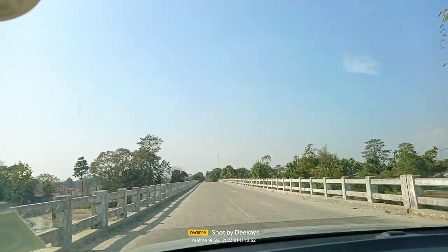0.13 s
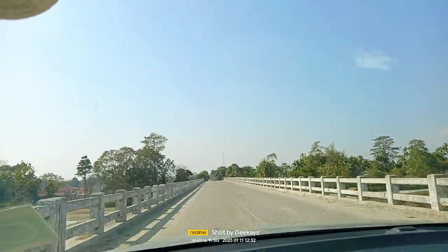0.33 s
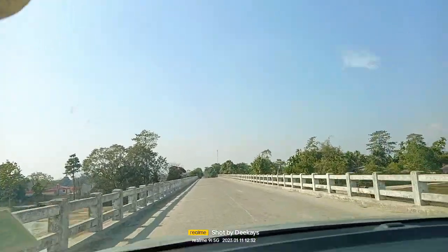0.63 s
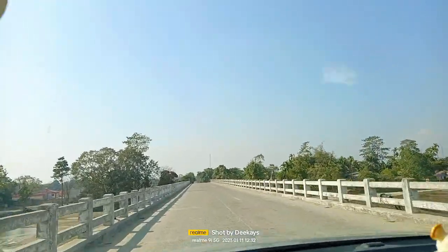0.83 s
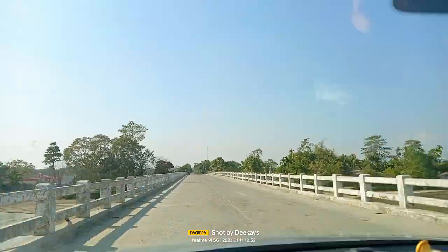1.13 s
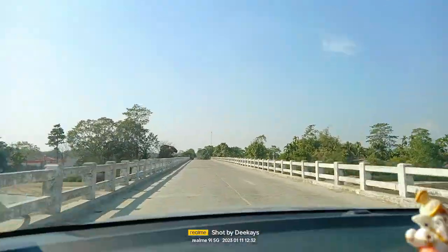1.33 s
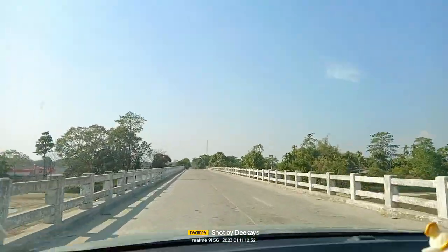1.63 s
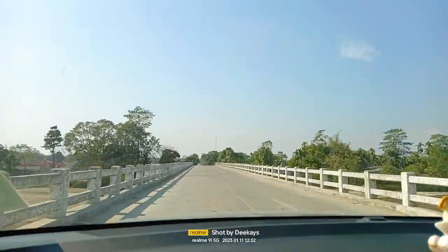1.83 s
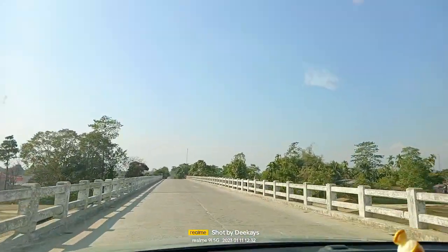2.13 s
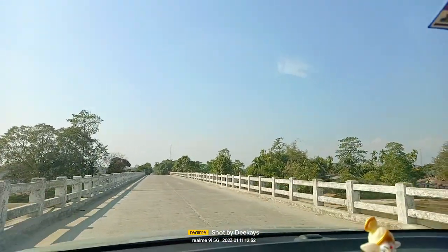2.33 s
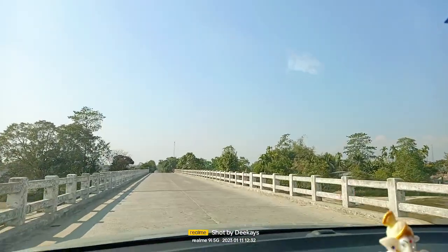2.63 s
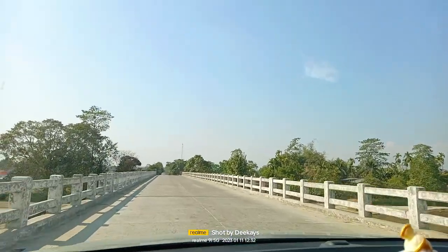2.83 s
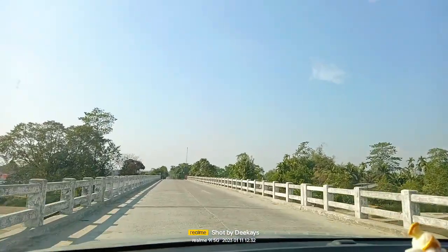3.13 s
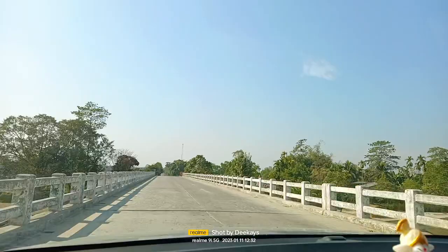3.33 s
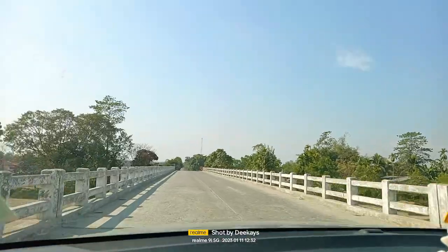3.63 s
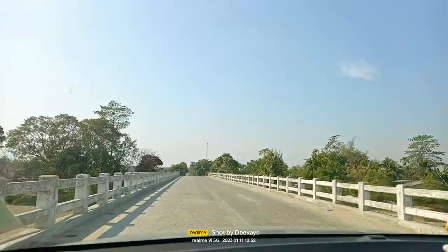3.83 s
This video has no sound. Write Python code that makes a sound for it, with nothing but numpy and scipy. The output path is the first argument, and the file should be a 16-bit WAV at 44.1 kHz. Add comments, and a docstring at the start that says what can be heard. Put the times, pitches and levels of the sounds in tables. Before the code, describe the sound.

Car interior on a concrete road: low rumble begins quietly, wheels hit a rough joint with booming thumps, trim knocks and a tiny metallic clink, then it settles into steady rumble, faint hiss and light ticks.

```python
"""Small car rolling onto a concrete bridge

Heard from the cabin: tyre roar is coloured noise plus narrow noise resonances, and body boom and
suspension pounding are low resonant noise. Bumps thump as swelling low sines; trim knocks are bursts
of contacts ringing plastic modes, panels are decaying sines, and loose bits rattle, clink and tick.
After the rough joint the car settles into an even rumble with soft thuds, under a thin hiss."""
import sys
import numpy as np
from scipy import signal
from scipy.fft import rfft, irfft
from scipy.io import wavfile
from scipy.ndimage import uniform_filter1d

SR = 44100
rng = np.random.default_rng(int(sys.argv[2]) if len(sys.argv) > 2 else 0)


def log_audio(samples):
    """Write samples as a 16-bit WAV file to the path given in sys.argv[1]."""
    # one column per channel
    frames = np.atleast_2d(samples).T
    # limit to full scale, then quantise
    limited = np.clip(frames, -1, 1)
    pcm = np.round(limited * 32767).astype(np.int16)
    wavfile.write(sys.argv[1], SR, pcm)


N = 176400  # 4 s
T = np.arange(N) / SR
HIT = T[:SR // 3]  # clock of a single hit, which stops after a third of a second

# Tyre roar, before the gains below: (time [s], level [dB])
ROAR_LEVEL = [(0, -46.5), (.6, -46), (.64, -38.5), (.73, -35.5), (.77, -49), (.81, -37.5), (.86, -31.5),
              (.99, -35), (1.17, -33.5), (1.26, -39.5), (1.37, -38.5), (1.51, -44.5), (1.62, -38),
              (1.76, -40.5), (2.1, -43.5), (2.65, -42), (3.15, -43), (3.5, -42), (4, -42)]
# Roar colour: (frequency [Hz], relative density [dB])
ROAR_COLOUR = [(25, -11.5), (80, -10), (190, 5.5), (300, 5.5), (490, 4), (750, 3.5), (1100, 0.5),
               (1600, -2.5), (2300, -8.5), (3000, -17.5), (3900, -23), (4800, -33), (6500, -35.5),
               (8000, -43.5), (9500, -38), (12000, -62.5), (16000, -42.5)]
# Tyre cavity resonances: (frequency [Hz], half-width [Hz], relative level [dB])
TYRE_RINGS = [(252.2, 16.2, -3.5), (358.5, 31, -10.5), (400.7, 37, -8.5), (600.4, 9.8, -12), (940, 160, -9),
              (1402, 30, -44.5), (2029, 150, -21)]
ROAR_GAIN_DB, RING_GAIN_DB = 2.5, 1.5
# Flutter depth, fastest flutter and the edges [Hz] of the bands that flutter
PATCHY_DB, PATCHY_HZ = 3.8, 11
BAND_EDGES = np.geomspace(170, 2700, 26)

# Shaking of the body, before its gain: (time [s], level [dB])
SHAKE_LEVEL = [(0, -43.5), (.18, -35), (.35, -24.5), (.52, -34), (.79, -30.5), (.88, -22.5), (1.2, -20.5),
               (1.35, -22.5), (1.52, -28.5), (1.76, -20.5), (1.92, -29.5), (2.3, -26), (2.75, -29.5),
               (3, -31.5), (3.15, -26.5), (3.38, -31), (3.6, -26), (3.8, -28), (4, -33.5)]
# Cabin resonances: (frequency [Hz], half-width [Hz], relative level [dB])
CABIN_BOOMS = [(101, 21.4, -1), (115.6, 18.5, -5), (150.7, 17, -6)]
SHAKE_GAIN_DB = -0.5

# Slow pounding of the suspension: (time [s], level [dB])
POUND_LEVEL = [(0, -40.5), (.2, -63), (.38, -38), (.57, -45), (.68, -38.5), (.95, -26), (1.5, -35.5),
               (2, -28.5), (2.4, -43.5), (3, -38), (3.5, -38), (4, -32)]
POUND_HZ, POUND_HALF_WIDTH_HZ = 50.5, 10

# Modes of the plastic trim: (frequency [Hz], relative level [dB], t60 in a knock [s])
TRIM_MODES = [(1070, -15, 0.12), (1388, -7.5, 0.052), (1651, -10, 0.093), (1854, -10, 0.1),
              (2078, -8, 0.05), (2434, -13, .07), (2623, -14, 0.023), (2910, -19, 0.046),
              (3717, -16, 0.035)]
# Chatter of loose bits: (time [s], level [dB])
CHATTER_LEVEL = [(0, -60.5), (.6, -54.5), (.66, -52), (.8, -45), (.88, -35), (1.02, -56), (1.18, -35.5),
                 (1.3, -54), (1.5, -54), (1.9, -53), (2.1, -56), (4, -55.5)]
CHATTER_PER_S, CHATTER_SPREAD_DB, CHATTER_T60_S = 190, 4, 0.031

# Faint steady hiss: (frequency [Hz], relative density [dB])
HISS_COLOUR = [(1000, 2), (4000, -2.5), (6500, -4.5), (8000, -8), (9300, -14), (11000, -16.5), (13800, -7),
               (15000, 5.5), (16000, 1.5)]
# Brighter opening hiss: (frequency [Hz], relative density [dB])
EARLY_HISS_COLOUR = [(1000, 17.5), (4000, 4.5), (6500, -3.5), (8000, -8), (9800, -4.5), (11000, -23),
                     (16000, -20)]
HISS_DB, EARLY_HISS_DB = -73, -49.5
EARLY_END_S, EARLY_FADE_S = 0.18, .09

# Trim knocks: (time [s], level before part gain [dB], lowest [Hz], highest [Hz],
#               snap relative to that level [dB], chatter length [s])
TRIM_KNOCKS = [(0.244, -43.5, 2550, 2960, -18.5, .004), (0.627, -33, 300, 3040, -23.5, .03),
               (.705, -36.5, 400, 2600, -40, .015), (.745, -41, 1750, 3670, -16, 0.018),
               (.839, -22.5, 504, 3600, -17, .003), (0.85, -20, 280, 3940, -19, .015),
               (0.884, -29, 596, 3740, -20, 0.011), (0.918, -34.5, 1790, 3600, -12.5, 0.019),
               (1.018, -62.5, 1800, 4050, 11, 0.0034), (1.115, -37, 1300, 3100, -23, 0.019),
               (1.158, -26.5, 1000, 3430, -24.5, 0.013), (1.202, -32, 1682, 3650, -14.5, 0.0067),
               (1.284, -43, 1760, 3700, -10, 0.022), (1.3935, -20, 1880, 3840, -19, .005),
               (1.396, -27, 460, 1120, -36, 0.0081), (1.579, -19, 1300, 4050, -24.5, .011),
               (1.634, -21.5, 1354, 3400, -19.5, .012), (1.662, -22.5, 221, 3180, -43, 0.0079),
               (1.669, -19.5, 243, 3060, -35, .006), (1.857, -24, 1295, 2630, -40.5, .018),
               (1.893, -30, 790, 2400, -41, .012), (1.93, -38.5, 1300, 2850, -34, .01),
               (2.076, -32.5, 614, 784, -33, .002), (2.189, -33.5, 790, 950, -35, 0.0037),
               (2.455, -50, 1970, 4000, -18, 0.0062)]
# Colour of snaps and ticks: (frequency [Hz], relative density [dB])
SNAP_COLOUR = [(2500, 1), (4200, -7.5), (5000, -0.5), (6500, -1.5), (8000, -10.5), (9600, -7.5),
               (11000, -24.5), (16000, -29.5)]
BODY_GAIN_DB = -1
TOUCHES, TOUCH_DB = 4, -5.5  # further contacts within each chatter
LEAD_S, LEAD_DB = 0.0035, -7.5  # a light graze comes before each knock
TRIM_GAIN_DB, MODE_SPREAD_DB = -9, 2  # modes against the cabin scatter
TRIM_SOFT_HZ = 2900  # upholstery dulls each knock above this
CABIN_T60_S, CABIN_BUILD_S = 0.078, .003
SNAP_T60_S, SNAP_BUILD_S = 0.066, .002

# Wheels meeting bumps: (time [s], envelope peak [dB], pitch [Hz], swell to peak [s])
BUMPS = [(0.63, -12.5, 93.8, 0.015), (.815, -16.5, 53, .03), (0.851, -10.5, 103.5, .02),
         (0.936, -17, 79, 0.012), (1.044, -7.5, 93.3, 0.03), (1.163, -11, 97.8, 0.031),
         (1.29, -15.5, 93.6, 0.023), (1.658, -21, 102, 0.032), (1.722, -8.5, 109, 0.018),
         (1.971, -17.5, 144.6, 0.019), (2.406, -16.5, 144, .016), (2.626, -15, 124.3, 0.025),
         (2.765, -22.5, 155.5, 0.023), (3.054, -16.5, 100.4, 0.028), (3.45, -21, 55, 0.027),
         (3.55, -17.5, 98.2, .02), (3.651, -17.5, 120.4, 0.019), (3.8, -18, 152, 0.019)]
THUMP_POWER = 2.37  # higher makes a tighter swell

# Jolts stirring the larger panels: (time [s], level before onset shaping [dB], pitch [Hz], t60 [s])
PANEL_NOTES = [(0.638, -30, 205, 0.32), (.86, -27.5, 311, 0.48), (1.12, -23.5, 253.9, 0.32),
               (1.58, -29.5, 254, 0.45), (1.665, -24, 373, 0.1), (1.86, -29, 359.6, 0.25),
               (2.421, -30.5, 248, 0.26), (2.671, -27.5, 244, 0.23), (2.98, -26.5, 255, 0.2)]
PANEL_RISE_S = 0.0022

# Small metal piece at the hardest jolt: (time [s], level before decay [dB])
CLINKS = [(.840, -40), (.848, -34.5)]
# Clink colour: (frequency [Hz], relative density [dB])
CLINK_COLOUR = [(7000, -22), (9500, -10), (12000, -15), (14000, -6), (15300, 5), (16000, -4)]
# Tiny dry ticks: (time [s], level before decay [dB])
DRY_TICKS = [(1.783, -53), (1.968, -56), (2.101, -53), (2.457, -57), (2.606, -55), (3.27, -52),
             (3.775, -55), (3.84, -55)]
CLINK_T60_S, TICK_T60_S = 0.065, .018

CUTOFF_HZ = 15900


def from_db(db):
    """Turn dB into a linear gain."""
    return 10 ** (np.asarray(db) / 20)


def rms_one(x):
    """Scale a signal to rms 1."""
    return x / np.sqrt(np.mean(x ** 2) + 1e-20)


def level(rows):
    """Gain along a dB curve."""
    return from_db(np.interp(T, *np.transpose(rows)))


def add(out, s, x):
    """Mix a sound in at a time in seconds."""
    i = int(s * SR)
    out[i:i + len(x)] += x[:N - i]


def noise(colour, size=N):
    """Noise of a given colour, drawn over log frequency; rms 1."""
    hz, db = np.transpose(colour)
    f = np.maximum(np.fft.rfftfreq(size, 1 / SR), 1)
    gain = from_db(np.interp(np.log(f), np.log(hz), db))
    return rms_one(irfft(rfft(rng.standard_normal(size)) * gain, size))


def resonance(hz, half_width_hz):
    """Noise through a resonance that halves in amplitude at its half-width; rms 1."""
    f = np.fft.rfftfreq(N, 1 / SR)
    peak = 1 / (1 + ((f - hz) / half_width_hz) ** 2)
    return rms_one(irfft(rfft(rng.standard_normal(N)) * peak, N))


def dying(t60):
    """Exponential decay of a hit, 60 dB down at t60."""
    return np.exp(-np.log(1000) * HIT / t60)


def build(rise_s):
    """Soft onset of a hit."""
    return 1 - np.exp(-HIT / rise_s)


def ring(hz):
    """Sine of one mode, not yet decaying."""
    return np.sin(2 * np.pi * hz * HIT)


def patchy(x):
    """Each narrow band swells and fades by itself."""
    f, spectrum = np.fft.rfftfreq(N, 1 / SR), rfft(x)
    out = x.copy()
    for low, high in zip(BAND_EDGES, BAND_EDGES[1:]):
        points = rng.standard_normal(int(2 * PATCHY_HZ * N / SR))
        slow = signal.resample_poly(points, 20, 1)
        drift = np.interp(T, np.linspace(0, N / SR, len(slow)), slow)
        gain = rms_one(from_db(PATCHY_DB * drift))
        band = irfft(spectrum * ((f >= low) & (f < high)), N)
        out += (gain - 1) * band
    return out


def road():
    """Tyres roar on concrete, ring in their cavities and shake the cabin into booming."""
    rings = sum(from_db(db + RING_GAIN_DB) * resonance(hz, width) for hz, width, db in TYRE_RINGS)
    roar = from_db(ROAR_GAIN_DB) * patchy(noise(ROAR_COLOUR))
    boom = sum(from_db(db) * resonance(hz, width) for hz, width, db in CABIN_BOOMS)
    # Even out the boom so that the shake curve sets its level
    boom = boom / np.sqrt(uniform_filter1d(boom ** 2, size=SR // 8))
    return level(ROAR_LEVEL) * (roar + rings) + from_db(SHAKE_GAIN_DB) * level(SHAKE_LEVEL) * boom


def suspension():
    """The sprung body pounds in the deep bass, as evened-out resonant noise."""
    deep = resonance(POUND_HZ, POUND_HALF_WIDTH_HZ)
    return level(POUND_LEVEL) * deep / np.sqrt(uniform_filter1d(deep ** 2, size=SR // 4))


def chatter():
    """Random light touches of loose bits, each ringing one mode of the trim."""
    out = np.zeros(N)
    touch_chance = CHATTER_PER_S / len(TRIM_MODES) / SR
    for hz, db, _ in TRIM_MODES:
        strength = from_db(CHATTER_SPREAD_DB * np.clip(rng.standard_normal(N), -2, 2))
        touches = (rng.random(N) < touch_chance) * strength
        mode = ring(hz) * dying(CHATTER_T60_S)
        out += from_db(db) * signal.fftconvolve(touches, mode)[:N]
    return level(CHATTER_LEVEL) * rms_one(out)


def hiss():
    """Thin coloured noise, brighter for the first moment."""
    early = np.clip((EARLY_END_S - T) / EARLY_FADE_S, 0, 1)
    steady = from_db(HISS_DB) * noise(HISS_COLOUR)
    return steady + from_db(EARLY_HISS_DB) * early * noise(EARLY_HISS_COLOUR)


def knock_contacts(chatter_s):
    """Impulses of one knock: a graze, the main contact, then quick touches of either sign."""
    contacts = np.zeros(len(HIT))
    contacts[0] = from_db(LEAD_DB)
    contacts[int(LEAD_S * SR)] = 1
    for k in range(TOUCHES):
        touch_s = LEAD_S + chatter_s * (k + rng.random()) / TOUCHES
        contacts[int(SR * touch_s)] += from_db(TOUCH_DB) * rng.choice([-1, 1])
    return contacts


def knock_body(low_hz, high_hz):
    """One contact rings the trim and scatters round the cabin, dulled by upholstery."""
    body = rng.standard_normal(len(HIT)) * dying(CABIN_T60_S) * build(CABIN_BUILD_S)
    for hz, db, t60 in TRIM_MODES:
        gain = from_db(db + TRIM_GAIN_DB + rng.normal(0, MODE_SPREAD_DB))
        body += gain * rng.choice([-1, 1]) * ring(hz) * dying(t60)
    filters = [signal.butter(5, low_hz, "high", fs=SR, output="sos"),
               signal.butter(8, high_hz, fs=SR, output="sos"),
               signal.butter(2, TRIM_SOFT_HZ, fs=SR, output="sos")]
    return signal.sosfilt(np.vstack(filters), body)


def knocks():
    """Plastic parts touch several times in quick succession, each with a dull body and sharp snap."""
    out = np.zeros(N)
    for s, db, low_hz, high_hz, snap_db, chatter_s in TRIM_KNOCKS:
        contacts = knock_contacts(chatter_s)
        body = knock_body(low_hz, high_hz)
        snap = noise(SNAP_COLOUR, size=len(HIT)) * dying(SNAP_T60_S) * build(SNAP_BUILD_S)
        for part, part_db in ((body, BODY_GAIN_DB), (snap, snap_db)):
            hit = signal.fftconvolve(contacts, part)[:len(HIT)]
            loudest = np.sqrt(uniform_filter1d(hit ** 2, size=SR // 100).max())  # 10 ms rms
            add(out, s - LEAD_S, from_db(db + part_db) * hit / loudest)
    return out


def thumps():
    """Each bump swells and dies as a low note of the cabin."""
    out = np.zeros(N)
    for s, db, hz, swell in BUMPS:
        u = HIT / swell
        envelope = (u * np.exp(1 - u)) ** THUMP_POWER
        add(out, s, from_db(db) * envelope * ring(hz))
    return out


def panels():
    """Jolts ring the larger panels as short hollow notes, decaying sines with a soft onset."""
    out = np.zeros(N)
    for s, db, hz, t60 in PANEL_NOTES:
        add(out, s, from_db(db) * ring(hz) * dying(t60) * build(PANEL_RISE_S))
    return out


def small_parts():
    """Bright metal clinks and a few dry ticks, as decaying bursts of noise."""
    out = np.zeros(N)
    for rows, colour, t60 in ((CLINKS, CLINK_COLOUR, CLINK_T60_S), (DRY_TICKS, SNAP_COLOUR, TICK_T60_S)):
        for s, db in rows:
            add(out, s, from_db(db) * noise(colour, size=len(HIT)) * dying(t60))
    return out


def scene():
    """Mix every layer to one channel."""
    steady = road() + suspension() + chatter() + hiss()
    hits = knocks() + thumps() + panels() + small_parts()
    return (steady + hits)[None]


def record(dry):
    """The microphone loses the deepest bass; a steep filter cuts the top."""
    dry = signal.sosfilt(signal.butter(2, 29, "high", fs=SR, output="sos"), dry)
    return signal.sosfilt(signal.ellip(10, .1, 80, CUTOFF_HZ, fs=SR, output="sos"), dry)


dry = scene()
out = record(dry)
log_audio(out)
```